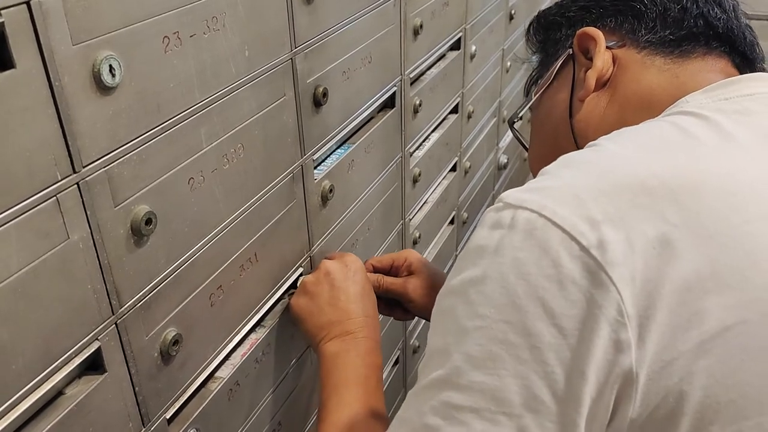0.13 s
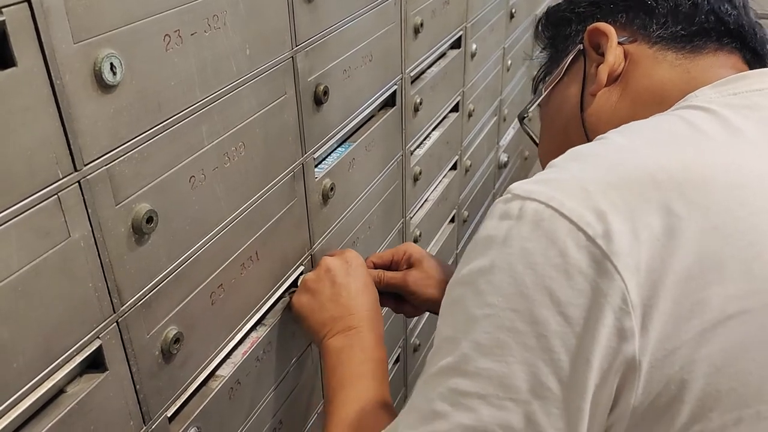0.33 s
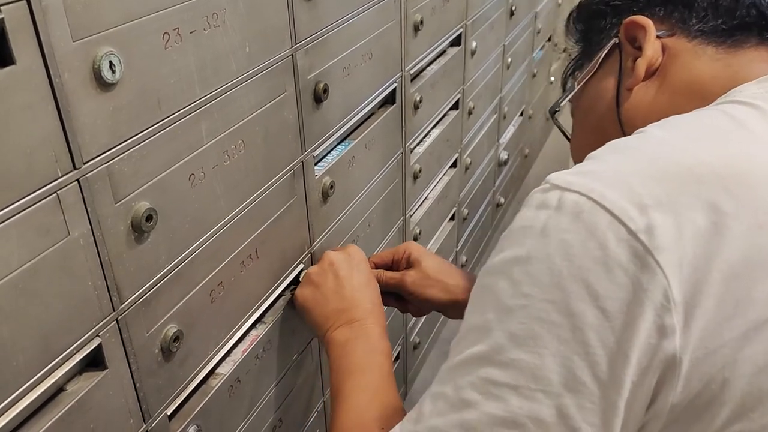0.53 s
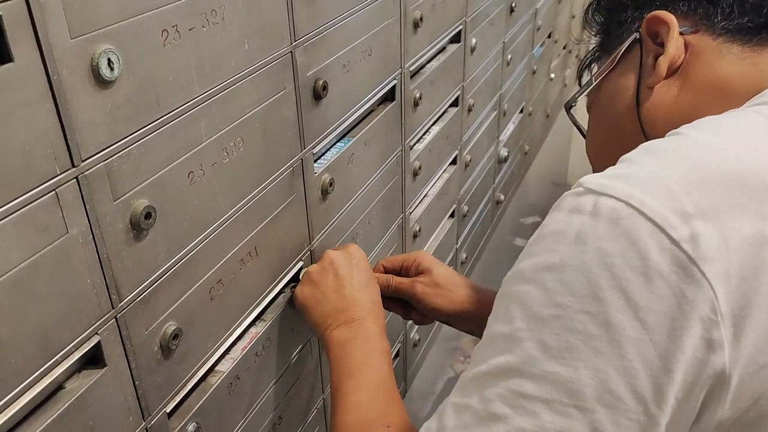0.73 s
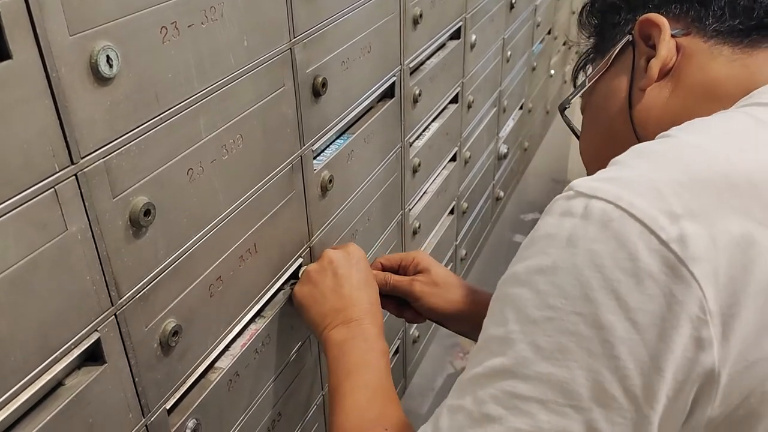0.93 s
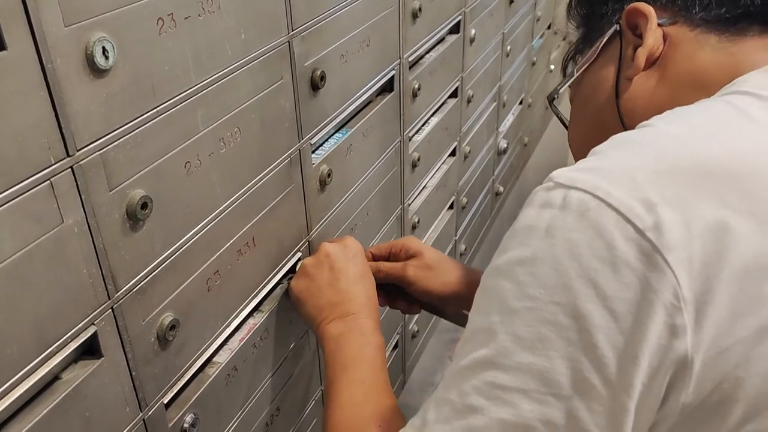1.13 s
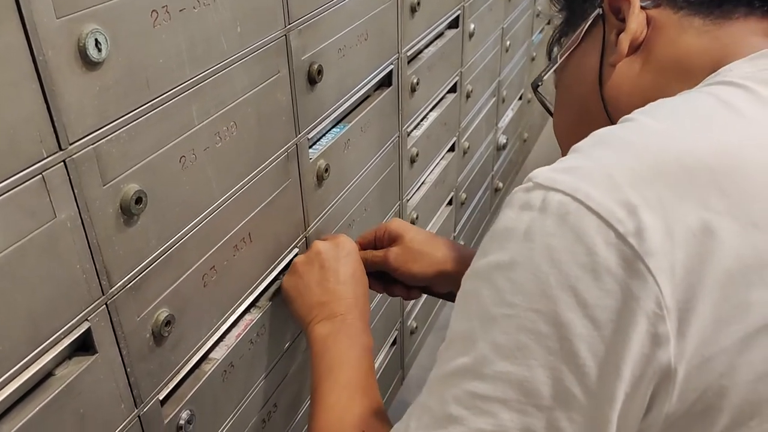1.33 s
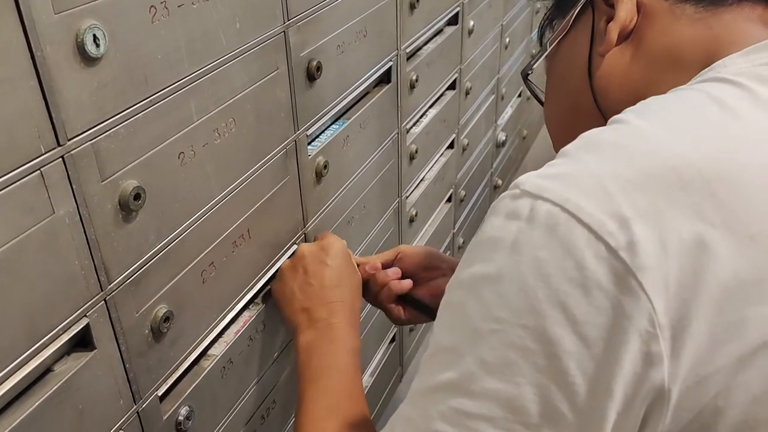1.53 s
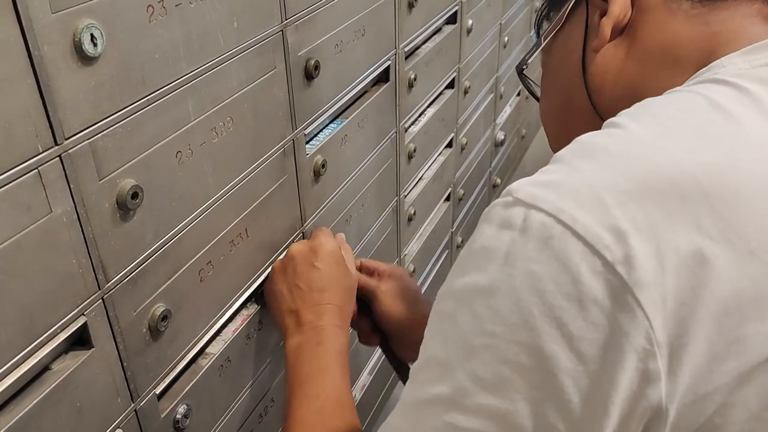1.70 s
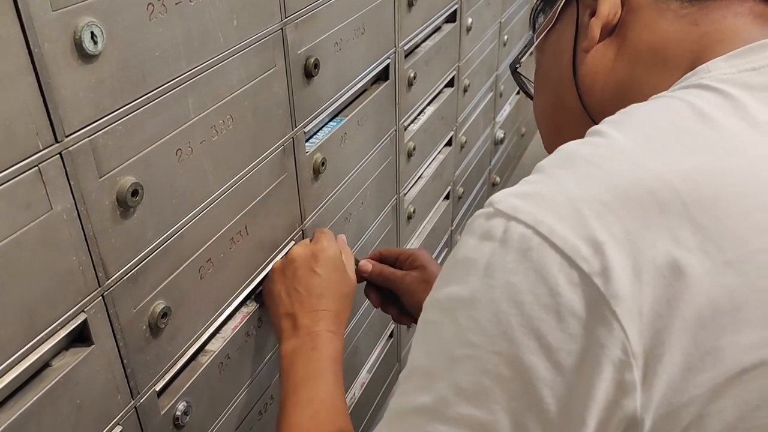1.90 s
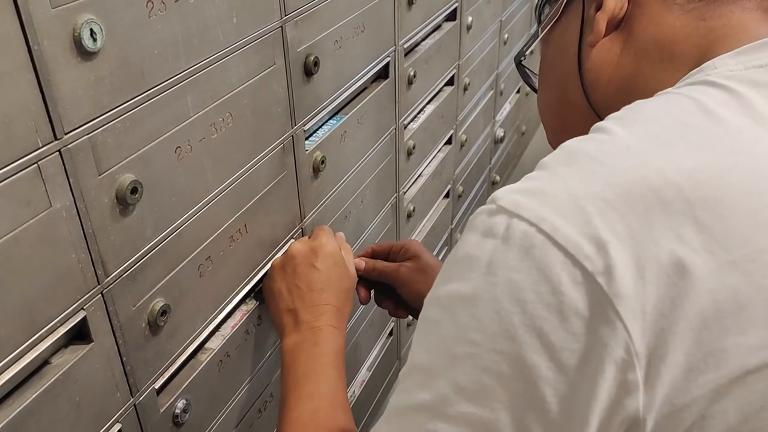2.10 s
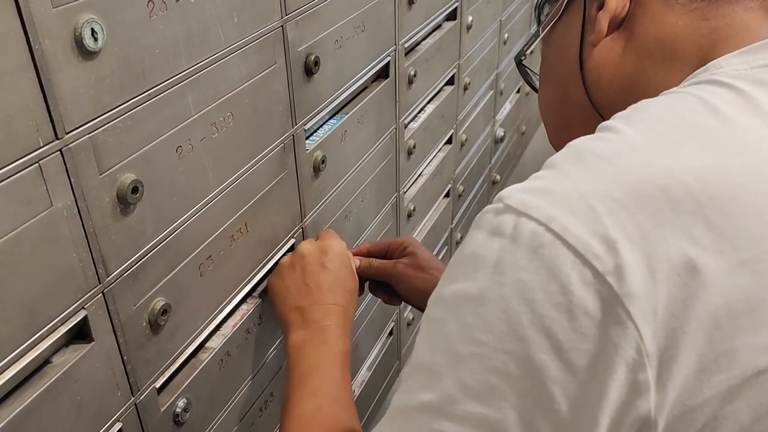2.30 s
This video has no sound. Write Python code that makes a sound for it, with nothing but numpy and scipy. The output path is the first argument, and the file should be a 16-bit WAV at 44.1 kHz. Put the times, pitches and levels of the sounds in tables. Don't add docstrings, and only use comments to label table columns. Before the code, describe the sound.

Sharp metallic clicks of a key worked in a thin steel mailbox lock, in an echoing lobby

```python
import sys
import numpy as np
from scipy import signal
from scipy.fft import rfft, irfft, next_fast_len
from scipy.io import wavfile
from scipy.ndimage import uniform_filter1d, map_coordinates

SR = 44100
rng = np.random.default_rng(int(sys.argv[2]) if len(sys.argv) > 2 else 0)


def to_linear_factor(level_db):
    exponent = np.asarray(level_db, float) / 20
    return 10 ** exponent


def materialize(psi):
    bounded = np.clip(np.atleast_2d(psi).T, -1, 1)
    quanta = np.round(bounded * 32767).astype(np.int16)
    wavfile.write(sys.argv[1], SR, quanta)


N = 103635

WET_DB = -3.5
PART_ROUGH = .75
TOP_HZ = 15750


def unit(x):
    return x / np.sqrt(np.mean(x ** 2) + 1e-20)


def along(points, hz):
    f, v = np.transpose(points)
    return np.interp(np.log(hz + 1), np.log(f + 1), v)


def curves(rows):
    s, *cols = np.transpose(rows)
    return [np.interp(np.arange(N) / SR, s, c) for c in cols]


def wobble(rate):
    knots = rng.standard_normal(int(N * rate / SR) + 4)
    return map_coordinates(knots, [np.arange(N) * rate / SR])


def filtered(x, response):
    n = x.shape[-1]
    m = next_fast_len(n + 2048)
    return irfft(rfft(x, m) * response(np.fft.rfftfreq(m, 1 / SR)), m)[..., :n]


def ring(modes, t, spread_db, short=1, rough=0):
    detune, rough_s = .003, .003
    out = 0
    for hz, db, t60 in modes:
        drift = rough * unit(uniform_filter1d(rng.standard_normal(len(t)), round(rough_s * SR)))
        level = to_linear_factor(db + spread_db * rng.normal() - 60 * t / (short * t60))
        pitch = hz * (1 + detune * rng.normal())
        out = out + level * np.sin(2 * np.pi * pitch * t + drift)
    return out


def ports(x):
    # f/Hz, phase by which left leads/radians
    lead = [(100, 0.15), (300, 0.42), (1000, 1.28), (3000, 1.46), (9000, 1.65), (15000, 1.6)]
    # f/Hz, left minus right level/dB
    lean = [(150, 2), (1000, 1), (2400, 3), (4400, -3), (8000, 3), (14000, 10)]
    half = np.array([[.5], [-.5]])
    return filtered(x, lambda hz: to_linear_factor(half * along(lean, hz)) * np.exp(1j * half * along(lead, hz)))


def lobby(x, wet_db):
    # f/Hz, t60/s
    room_decay = [(200, 0.85), (600, 0.26), (1500, 0.19), (4000, 0.3), (10000, 0.26), (16000, 0.14)]
    late_db, late_slow, wall_s = -23, 3.2, .005
    hz, t, z = signal.stft(rng.standard_normal((2, 2 * SR // 5)), SR, nperseg=256)
    fall_db = -60 * t / along(room_decay, hz)[:, None]
    both_slopes = to_linear_factor(fall_db) + to_linear_factor(late_db + fall_db / late_slow)
    tail = signal.istft(z * both_slopes, SR, nperseg=256)[1]
    tail = np.pad(tail / np.linalg.norm(tail[0]), ((0, 0), (round(wall_s * SR), 0)))
    wet = to_linear_factor(wet_db) * signal.fftconvolve(x[None], tail, axes=1)
    return wet + np.pad(ports(x), ((0, 0), (0, wet.shape[1] - len(x))))


def add(out, s, x):
    part = out[:, round(s * SR):][:, :x.shape[1]]
    part += x[:, :part.shape[1]]


def lock_clicks():
    # t/s, peak level/dB,
    # dull part/dB, bright part/dB
    contact_clicks = [(.2334, -20, -5, -9), (.2384, -23.5, 1.5, -13), (.2490, -33, 11.5, -1),
                      (.4539, -10.5, 0.5, 5.5), (.4604, -19.5, 7.5, 5), (.4694, -11, -8.5, -38),
                      (.6000, -12.5, -5.5, 7), (.6036, -18.5, -2, 4), (.6064, -15, -2.5, 3.5),
                      (1.2735, -33, -9, -3.5), (1.3478, -25.5, -2.5, 0.5), (1.3534, -22.5, -14, -6.5),
                      (1.4334, -41.5, 20.5, -13),
                      (1.716, -41, -1, -22),
        (1.7220, -35, 10, -12),
        (1.7422, -21.5, -1.5, -22),
        (1.7480, -25, 6.5, -24),
        (1.781, -30.5, 9.5, 4.5),
        (1.8100, -32, 5.5, 0),
        (1.8192, -32.5, 3, 8),
        (1.9318, -44.5, -7, 19),
        (1.9385, -51, -9, 21),
        (2.3474, -48.5, 2, 15),
    ]
    # f/Hz, level/dB, t60/s
    lock_modes = [(1156, -2.5, 0.051), (1625, 0, 0.34), (2450, -3, 0.26), (3180, -30, 0.033),
                  (3680, -11, 0.29), (3905, -1, 0.1), (4600, -22, .12), (5000, 5.5, 0.13), (8870, -1, 0.12),
                  (9700, -9, 0.14)]
    # f/Hz, density/dB per Hz
    crack_tone = [(180, -49), (400, -8), (1000, -4), (2030, -2.5), (4000, -2.5), (5500, -6), (7000, -8),
                  (13500, -17)]
    dull_hz, bright_hz = 2140, 7700
    crack_db, crack_t60, ring_db = -3.5, 0.03, -23.5
    out, t = np.zeros((2, N)), np.arange(SR // 12) / SR
    rise = 1 - np.exp(-t / 0.00071)
    for s, db, dull_db, bright_db in contact_clicks:
        def tone_db(hz):
            dull = dull_db / (1 + (hz / dull_hz) ** 4)
            return dull + bright_db / (1 + (bright_hz / (hz + 1)) ** 4)

        noise = unit(filtered(rng.standard_normal(len(t)), lambda hz: to_linear_factor(along(crack_tone, hz))))
        crack = to_linear_factor(crack_db - 60 * t / crack_t60) * filtered(noise, lambda hz: to_linear_factor(tone_db(hz)))
        coloured = [(hz, level + tone_db(hz), t60) for hz, level, t60 in lock_modes]
        body = to_linear_factor(ring_db) * ring(coloured, t, 3, short=0.47, rough=.9)
        add(out, s, to_linear_factor(db) * lobby((crack + body) * rise, WET_DB))
    return out


def struck(modes, hits):
    out, t = np.zeros((2, N)), np.arange(SR // 6) / SR
    rise = 1 - np.exp(-t / 0.00018)
    for s, db in hits:
        blow = ring(modes, t, 1.5, rough=PART_ROUGH) * rise
        add(out, s, to_linear_factor(db) * lobby(blow, -8))
    return out


def lock_parts():
    # t/s, level/dB
    key_modes = [(3500, -11, 0.049), (5500, 1, 0.065), (5740, -6, 0.034), (4500, -18, .04),
                 (6600, -4, 0.048)]
    key_hits = [
        (1.9318, -38.5),
        (1.9369, -44.5),
    ]
    pin_modes = [(3350, -2.5, 0.02), (4270, -2, 0.032), (5190, 2, 0.038), (5320, 1, 0.037),
                 (6320, -1, 0.044)]
    pin_hits = [
        (1.2734, -36.5),
        (1.2800, -52),
        (1.2880, -39),
        (1.6105, -53.5),
        (2.182, -53.5),
        (2.203, -63),
    ]
    bolt_modes = [(5155, 5.5, 0.034), (5240, -1.5, 0.036)]
    bolt_hits = [
        (.2337, -37),
        (.2490, -39.5),
        (0.4551, -22),
        (0.471, -36),
        (0.6009, -25.5),
        (0.606, -33),
    ]
    cam_modes = [(2860, -3, 0.027), (3190, 0.5, 0.029), (3575, -0.5, 0.032), (4030, -1, 0.034),
                 (5460, -1, 0.04)]
    cam_hits = [
        (1.3482, -28),
        (1.3548, -41),
    ]
    clip_modes = [(10200, 3.5, 0.087), (9000, -8, .04)]
    clip_hits = [
        (1.823, -47),
    ]
    pairs = [(key_modes, key_hits), (pin_modes, pin_hits), (bolt_modes, bolt_hits),
             (cam_modes, cam_hits), (clip_modes, clip_hits)]
    return sum(struck(modes, hits) for modes, hits in pairs)


def door_parts():
    # t/s, level/dB
    door_modes = [(1070, -9.5, 0.14), (1430, -8, 0.13), (1662, -3.5, .19), (1977, -4.5, 0.33),
                  (2430, -5, 0.27), (2670, -3.5, 0.18), (3284, -10, .3), (3854, -3, .15), (4800, -10, .18),
                  (5195, 2, 0.19)]
    door_hits = [
        (0.2336, -46),
        (0.4541, -33),
        (.4696, -38),
    ]
    frame_modes = [(868, -6.5, 0.25), (1041, -2.5, 0.18), (1610, -12, 0.27), (3084, -1, .18),
                   (3500, -6, .12), (4170, -3.5, 0.32), (4800, 3, .14), (5030, -13, 0.15), (5520, -8, 0.18),
                   (6470, -3, 0.17), (7530, -2, 0.13)]
    frame_hits = [
        (0.5999, -34),
        (0.6072, -38.5),
        (1.3485, -44),
        (1.3551, -45.5),
    ]
    lip_modes = [(2790, 0, .05), (3500, -4, .03), (4230, -3, 0.032), (4870, -2, .03)]
    lip_hits = [
        (1.716, -48),
        (1.7424, -38),
        (1.7474, -41),
        (1.781, -40),
        (1.819, -37),
    ]
    flex_modes = [(582, -2.5, 0.17), (659, -5, 0.15), (1020, 1.5, 0.12), (1520, 2, 0.032)]
    flex_hits = [(.7655, -48), (.774, -44), (1.285, -47), (1.349, -41), (1.434, -47), (1.440, -60),
                 (1.449, -47), (1.765, -38.5), (1.826, -44), (1.862, -48.5), (1.884, -44.5), (1.896, -43),
                 (1.910, -50.5)]
    pairs = [(door_modes, door_hits), (frame_modes, frame_hits), (lip_modes, lip_hits),
             (flex_modes, flex_hits)]
    return sum(struck(modes, hits) for modes, hits in pairs)


def box_thumps():
    # t/s, box drum level/dB, walls relative to drum/dB
    thump_hits = [
        (0.232, -38.5, -27),
        (0.602, -25.5, -3.5),
        (1.277, -37.5, -36),
        (1.349, -34.5, -7),
        (1.723, -48.5, -6),
        (1.758, -39, -17),
        (1.809, -33, -13),
        (1.845, -39.5, -13),
    ]
    # f/Hz, level/dB, t60/s
    drum_modes = [(145.7, 3, 0.23), (163.2, -1, 0.14)]
    # f/Hz, level/dB, t60/s
    wall_modes = [(233.5, -2.5, 0.25), (307, -2, 0.13), (394.3, 0, 0.096), (460, 5.5, 0.1), (552, 1, 0.14)]
    out, t = np.zeros((2, N)), np.arange(SR // 5) / SR
    rise = 1 - np.exp(-t / .005)
    for s, db, walls_db in thump_hits:
        drum = ring(drum_modes, t, 0.95)
        walls = to_linear_factor(walls_db) * ring(wall_modes, t, 0.86, rough=PART_ROUGH)
        add(out, s, to_linear_factor(db) * ports((drum + walls) * rise))
    return out


def key_slides():
    # t/s, level/dB, length/s, low f/Hz, top f/Hz
    slide_rows = [
        (.1825, -55, 0.013, 1000, 9000),
        (.5900, -41, 0.0096, 500, 9000),
        (.7652, -43.5, 0.015, 397, 2800),
        (.7654, -51.5, 0.008, 2470, 12500),
        (1.608, -55.5, 0.014, 1500, 11900),
        (2.182, -56.5, 0.024, 1000, 9500),
        (2.241, -59, 0.014, 4000, 13900),
    ]
    fade_s, grain_db = .003, 2.5
    out, t = np.zeros((2, N)), np.arange(SR // 12) / SR
    for s, db, length, low_hz, top_hz in slide_rows:
        grain = unit(uniform_filter1d(rng.standard_normal(len(t)), size=40))
        rub = rng.standard_normal(len(t)) * to_linear_factor(grain_db * grain)
        rub = unit(filtered(rub, lambda hz: 1 / (1 + (hz / top_hz) ** 8) / (1 + (low_hz / (hz + 1)) ** 3)))
        bite = (1 - np.exp(-t / .0004)) * (1 + 1.4 * np.exp(-t / 0.0034))
        stop = 1 / (1 + np.exp((t - length) / fade_s))
        add(out, s, to_linear_factor(db) * lobby(bite * stop * rub, -3.5))
    return out


def door_scrape():
    # t/s, force/dB
    drag_force = [
        (1.72, -46),
        (1.748, -40),
        (1.772, -44),
        (1.827, -31.5),
        (1.859, -37),
        (1.894, -35),
        (1.956, -68),
        (1.96, -62),
    ]
    # f/Hz, width/Hz, level/dB
    panel_modes = [(653, 74, -3), (972, 29, -5), (2860, 590, 0), (4730, 600, -11), (10060, 110, -8)]
    # f/Hz, density/dB per Hz
    scrape_tone = [(150, -33), (300, -1.5), (700, 2.5), (1500, -2), (3060, -11), (6500, -6.5), (16000, -28)]
    first_s, last_s = drag_force[0][0], drag_force[-1][0]
    force_db, = curves([(first_s - .01, -110), *drag_force, (last_s + 0.012, -110)])
    sparse = (rng.random(N) < 2500 / SR) * to_linear_factor(3.7 * rng.standard_normal(N))
    slips = rng.standard_normal(N) * (sparse + 0.27) * to_linear_factor(3.2 * wobble(140))

    def panel(f):
        modes = sum(to_linear_factor(db) * 1j * f * w / (c * c - f * f + 1j * f * w) for c, w, db in panel_modes)
        return to_linear_factor(along(scrape_tone, f)) * (0.35 + modes)

    drag = to_linear_factor(force_db - 5.5) * unit(filtered(slips, panel))
    out, start = np.zeros((2, N)), first_s - .05
    add(out, start, lobby(drag[round(start * SR):][:SR // 3], WET_DB - 5.5))
    return out


def far_traffic():
    # f/Hz, density/dB per Hz
    traffic_tone = [(20, 2), (110, 8), (260, -3), (550, -0.5), (1200, -9), (2200, -11.5), (7000, -28),
                    (15500, -55)]
    # t/s, level/dB
    traffic_level = [
        (0.0, -53.5),
        (0.68, -52),
        (0.82, -53.5),
        (1.11, -56),
        (1.81, -54),
        (2.22, -57),
        (2.35, -57.5),
    ]
    # f/Hz, left-right likeness/0 to 1
    alike = [(30, 0.93), (200, 0.75), (500, 0.51), (1000, 0), (15000, 0)]
    # f/Hz, left minus right level/dB
    floor_lean = [(60, 1.5), (380, -1), (2380, -1), (15000, -6)]
    z = signal.stft(rng.standard_normal((2, N)), nperseg=512)[2]
    patches = uniform_filter1d(uniform_filter1d(rng.standard_normal(z.shape[1:]), 6, 0), 14, 1)
    pair = signal.istft(z * to_linear_factor(1.3 * unit(patches)), nperseg=512)[1][:, :N]

    def spread(hz):
        turn = np.arccos(np.clip(along(alike, hz), -1, 1)) / 2
        return to_linear_factor(along(traffic_tone, hz)) * [np.cos(turn), np.sin(turn)]

    def tilt(hz):
        half = np.array([[.5], [-.5]])
        return to_linear_factor(half * along(floor_lean, hz)) / (1 + (hz / TOP_HZ) ** 60)

    mid, side = filtered(pair, spread)
    noise = filtered(np.array([mid + side, mid - side]), tilt)
    level_db, = curves(traffic_level)
    return to_linear_factor(level_db + 6.5) * unit(noise)


def idling_engine():
    # t/s, level of orders one, two, three and five/dB
    engine_level = [
        (0.0, -46.5, -65, -84, -56),
        (0.14, -63, -46, -60, -64),
        (0.44, -64, -48.5, -71, -75),
        (0.59, -45.5, -47.5, -50, -76),
        (1.2, -61, -57, -57.5, -59),
        (1.71, -49, -56, -45, -54),
        (2.14, -71, -59, -54.5, -62.5),
        (2.35, -46, -78, -47, -57.5),
    ]
    order_numbers = [1, 2, 3, 5]
    turn_hz, width_hz = 30.1, 5.824
    t = np.arange(N) / SR
    orders = 0
    for k, db in zip(order_numbers, curves(engine_level)):
        level = to_linear_factor(db + 0.9 + 2.3 * wobble(width_hz))
        orders = orders + level * np.sin(2 * np.pi * k * turn_hz * t + 1.8 * wobble(width_hz))
    return orders * to_linear_factor(1.5 * wobble(5.07) * np.array([[1], [-1]]))


def scene():
    near = lock_clicks() + lock_parts() + door_parts() + box_thumps() + key_slides() + door_scrape()
    return near + far_traffic() + idling_engine()


def roll_off(x):
    return signal.sosfilt(signal.butter(12, 16650, fs=SR, output="sos"), x)


def record(dry):
    hiss = to_linear_factor(-73.5) * filtered(rng.standard_normal(dry.shape), lambda hz: hz < TOP_HZ)
    mix = filtered(dry + hiss, lambda hz: 1 / (1 + (hz / TOP_HZ) ** 60))
    return roll_off(mix)


dry = scene()
out = record(dry)
materialize(out)
```